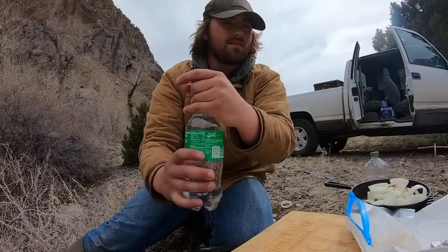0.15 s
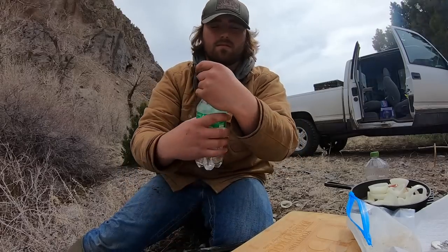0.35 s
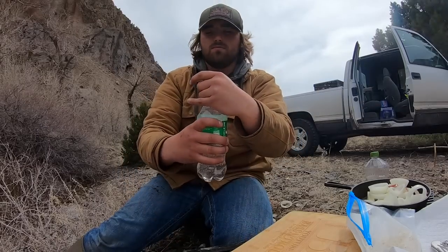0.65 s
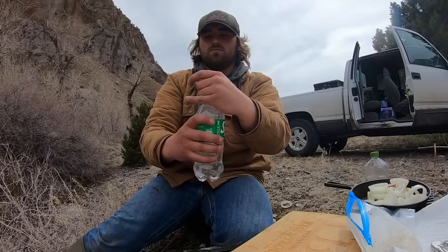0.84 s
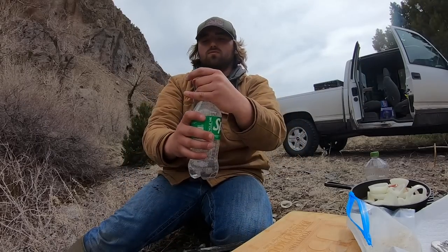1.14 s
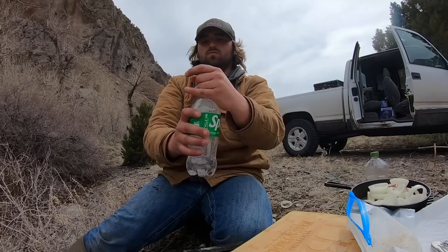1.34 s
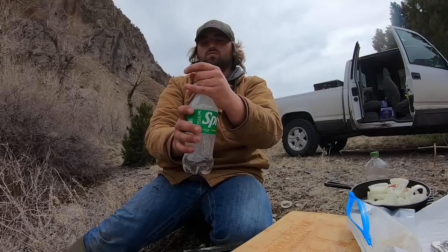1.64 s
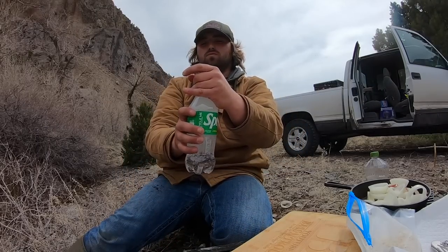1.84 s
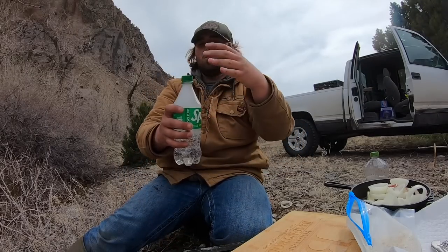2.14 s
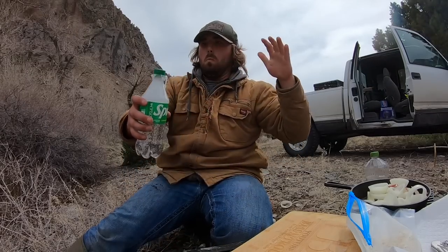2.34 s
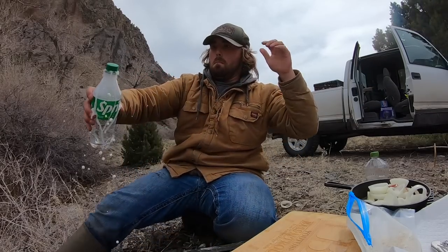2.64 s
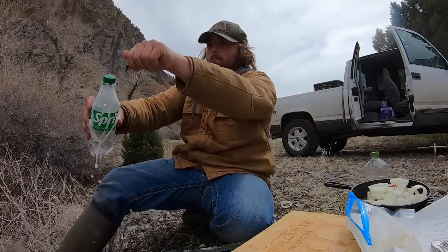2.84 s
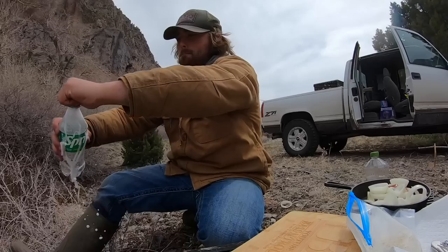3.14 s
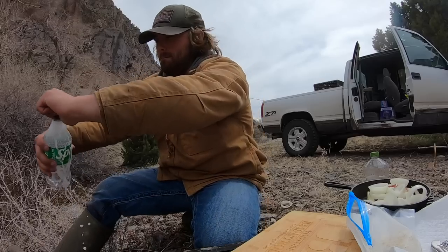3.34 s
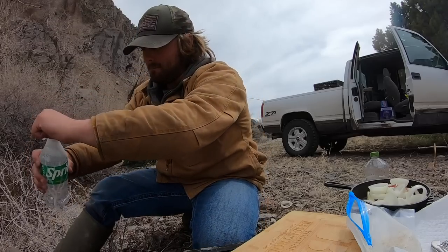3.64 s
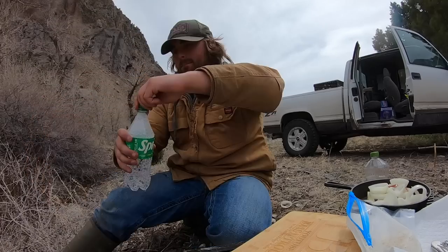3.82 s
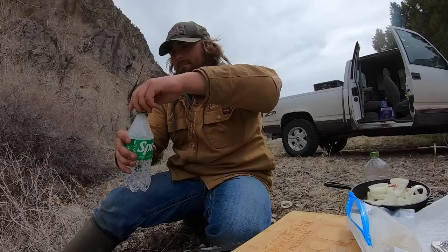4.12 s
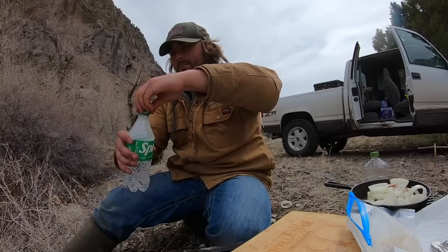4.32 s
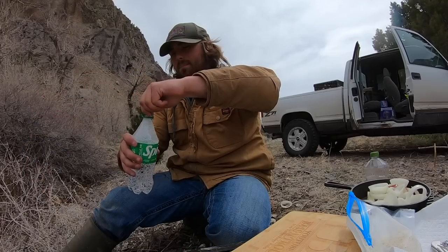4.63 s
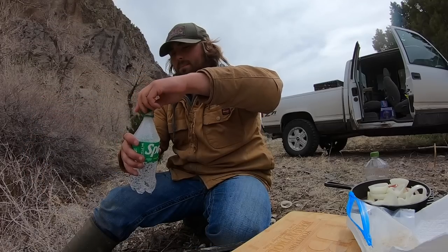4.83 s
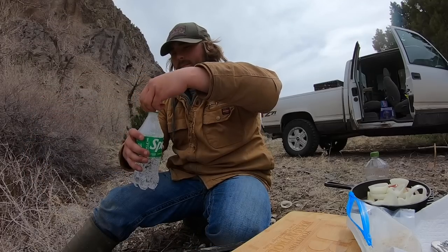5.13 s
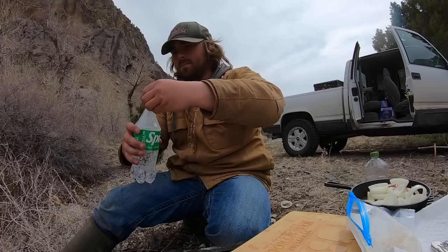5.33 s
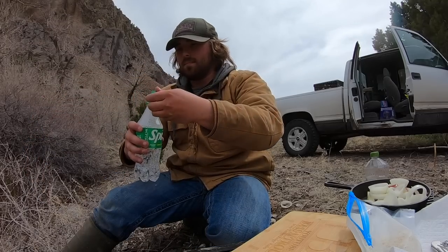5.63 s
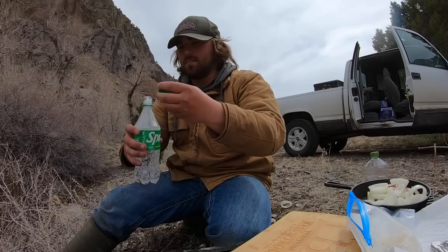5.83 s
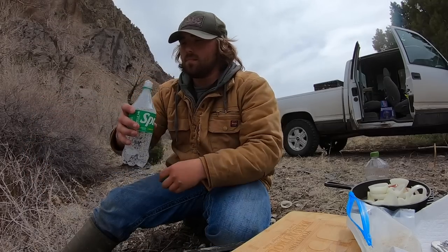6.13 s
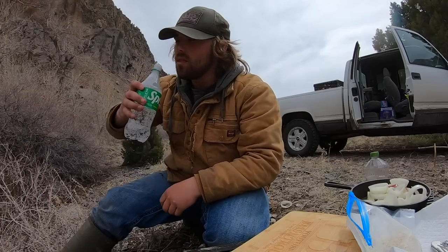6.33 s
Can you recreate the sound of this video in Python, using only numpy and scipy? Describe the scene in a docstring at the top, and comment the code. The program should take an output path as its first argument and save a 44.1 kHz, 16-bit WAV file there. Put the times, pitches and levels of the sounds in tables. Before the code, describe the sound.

Gas hisses from a loosening plastic bottle cap, foam sprays and fizzes, then small clicks and a sharp final snap amid wind and a distant drone.

```python
"""A plastic bottle of fizzy drink is opened outdoors, a metre from the microphone, in wind and a far propeller's drone.
At first gas leaks past the cap as noise through narrow resonances; from 1.4 s cap and fingers click as damped modes.
From 2.07 s foam sprays, noise and random clicks ringing the neck, until the cap is closed again near 3.1 s.
The froth fizzes on as dense tiny clicks until 3.84 s; the cap is unscrewed with rubs and clicks up to 5.6 s.
Wind buffets the microphone as low noise, hardest near 5 s; a faint far bird whistles twice after 6 s."""
import sys
import numpy as np
from scipy import signal
from scipy.fft import rfft, irfft
from scipy.io import wavfile
from scipy.ndimage import uniform_filter1d

SR = 44100
rng = np.random.default_rng(int(sys.argv[2]) if len(sys.argv) > 2 else 0)


def master(y):
    """Save y as 16-bit WAV."""
    cut = np.clip(np.atleast_2d(y).T, -1, 1)
    pcm = np.round(cut * 32767)  # scale
    wavfile.write(sys.argv[1], SR, pcm.astype(np.int16))


N = 285327
T = np.arange(N) / SR  # time [s]
RING_N = 6000  # samples kept of each short response

# damped modes of the plastic cap: (frequency [Hz], level [dB], time to fall 60 dB [s])
CAP_MODES = [(766, -4, 0.0063), (1160, 3, 0.0043), (1710, -1, 0.0049), (2085, -4.5, 0.0083),
             (2910, -4.5, 0.0055), (3530, -2, 0.0042), (4070, 1, 0.0052), (4615, -3.5, 0.0081),
             (5420, -0.5, 0.0036), (6340, -4, 0.0037), (7420, -4.5, 0.0031), (9190, -5.5, 0.0055),
             (10540, -2.5, 0.0046), (12770, -7.5, 0.0037), (14060, -6.5, 0.0042)]


def undb(db):
    """Gain of a level in dB."""
    return 10 ** (np.asarray(db) / 20)


def unit(x):
    """Scaled to rms 1."""
    return x / np.sqrt(np.mean(x ** 2))


def smooth_twice(x, n):
    """Two running means of n samples in a row."""
    return uniform_filter1d(uniform_filter1d(x, n), n)


def played(table):
    """Columns of a table whose first column is time, interpolated on every sample."""
    s, *columns = np.transpose(table)
    return [np.interp(T, s, column) for column in columns]


def walk(rate):
    """Random levels held for 1 / rate seconds and smoothed twice, rms 1."""
    k = int(SR / rate)
    steps = np.repeat(rng.standard_normal(N // k + 1), k)
    return unit(smooth_twice(steps, k)[:N])


def steady(x, span_s):
    """Noise with its own slow swells evened out, rms close to 1."""
    return x / np.sqrt(smooth_twice(x ** 2, int(span_s * SR)))


def burst(start, rise, hold, fall_db, db):
    """Gain that rises evenly to a level in dB, holds, then falls by so many dB a second."""
    falling_s = np.maximum(T - start - rise - hold, 0)
    return np.clip((T - start) / rise, 0, 1) * undb(db - fall_db * falling_s)


def coloured(points):
    """Noise whose spectrum joins (Hz, dB) points on a log frequency axis, silent outside them."""
    hz, db = np.transpose(points)
    f = np.maximum(np.arange(N // 2 + 1) * SR / N, 1)
    gain = undb(np.interp(np.log(f), np.log(hz), db, left=-120, right=-120))
    return irfft(rfft(rng.standard_normal(N)) * gain, N)


def crackle(rate, spread_db):
    """Random clicks of either sign, rate per second on average, a few larger than the rest; rms 1."""
    hit, size, sign = rng.random((3, N))
    height = undb(-spread_db * np.log(1 - .98 * size))
    return unit((hit < rate / SR) * height * np.sign(sign - .5))


def resonant(x, peaks, drift_db=0.):
    """Sum of band-pass resonances of alternate sign whose strengths may wander, rms 1."""
    out = 0
    for k, (hz, width, db) in enumerate(peaks):
        band = signal.lfilter(*signal.iirpeak(hz, hz / width, SR), x)
        out = out + (-1) ** k * undb(db + drift_db * walk(6.94)) * band
    return unit(out)


def ring(modes, weight_db):
    """Response of damped modes of alternate sign to a blow, peak 1."""
    t = T[:RING_N]
    y = 0
    for k, (hz, db, t60) in enumerate(modes):
        decay = 1000. ** (-t / t60)  # 60 dB down after t60
        y = y + (-1) ** k * undb(db + weight_db[k]) * np.sin(2 * np.pi * hz * t) * decay
    return y / np.abs(y).max()


def nearness(hz, octaves):
    """How strongly a contact brightest at hz drives each cap mode, in dB; it falls faster above."""
    away = np.log2(np.array(CAP_MODES)[:, 0] / hz) / max(octaves, .1)
    return -4.0 * np.log2(1 + away ** 2) * np.where(away > 0, 1.3, 1)


def air():
    """Almost steady hiss of open air and microphone: coloured noise."""
    # spectrum of the hiss: (frequency [Hz], relative density [dB])
    hiss_spectrum = [(53, -34), (90, -4.5), (109, -15.5), (162, -17), (376, -22.5), (478, -20.5),
                     (556, -23), (769, -24), (4550, -30), (12100, -34), (16000, -39)]
    return unit(coloured(hiss_spectrum)) * undb(-63.5 + 0.14 * walk(2.295))


def drone():
    """Propeller blade tones, four multiples of the blade rate, that waver on their long path through the air."""
    # (time [s], blade rate [Hz], mean rms level of multiples 1, 2, 3 and 4 [dB each])
    blade_tones = [(0, 81.7, -56.5, -73.5, -77.5, -91), (1.5, 81.5, -61.5, -70, -78.5, -78),
                   (1.8, 81.4, -61, -61.5, -76.5, -79), (1.86, 81.3, -83, -63.5, -77, -82),
                   (2.03, 81.28, -76, -62, -73, -83), (2.12, 82.5, -60.5, -67, -78.5, -83),
                   (3.1, 82.3, -66.5, -66, -70, -79), (3.7, 82.05, -61, -72.5, -75.5, -88),
                   (4.0, 81.8, -63, -96, -88, -97), (5.8, 79.13, -65, -83.5, -90.5, -94),
                   (6.47, 78.5, -55.5, -81, -78, -92)]
    hz, *levels = played(blade_tones)
    phase = 2 * np.pi * np.cumsum(hz) / SR
    out = 0
    for k, db in enumerate(levels, 1):
        wavering = undb(db + 2.0 * walk(5.05))
        out = out + np.sqrt(2) * wavering * np.sin(k * phase + k)
    return out


def bird():
    """Short falling whistles of a faint far bird: gliding sines that swell and fade."""
    # (start [s], length [s], first frequency [Hz], last frequency [Hz], peak level [dB])
    whistles = [(6.058, .055, 3450, 3200, -68), (6.235, .03, 3150, 3100, -68)]
    out = 0
    for s, length, hz0, hz1, db in whistles:
        part = np.clip((T - s) / length, 0, 1)
        phase = 2 * np.pi * np.cumsum(hz0 + (hz1 - hz0) * part) / SR
        out = out + undb(db) * np.sin(np.pi * part) * np.sin(phase)
    return out


def wind():
    """Slow pressure swings at the microphone, buffeting in small gusts, and a flutter that grows faster than it."""
    # strength of the wind: (time [s], pressure swings [dB], buffeting before small gusts [dB])
    gusts = [(0.0, -29.5, -42), (.13, -35, -36), (.35, -37.5, -48), (.95, -37.5, -47), (1.2, -41.5, -66),
             (1.75, -26, -51), (1.9, -37, -48), (2.2, -39, -64), (2.36, -29.5, -51), (2.5, -40.5, -62),
             (2.7, -31, -50.5), (3.03, -45.5, -62.5), (3.25, -28, -55), (3.55, -37.5, -65.5),
             (3.85, -32.5, -44.5), (4.15, -33.5, -48.5), (4.35, -22, -41), (4.6, -39.5, -52.5),
             (4.74, -30.5, -51.5), (4.8, -38, -33), (4.93, -20.5, -19.5), (5.05, -16.5, -28),
             (5.13, -32.5, -46.5), (5.45, -33.5, -50.5), (5.82, -29, -43.5), (6.03, -36.5, -58),
             (6.3, -28, -42), (6.47, -39, -48.5)]
    # spectra of the three motions: (frequency [Hz], relative density [dB])
    swing_spectrum = [(2, -6.5), (6, 1.5), (14, -4), (26, -24)]
    buffet_spectrum = [(20, 2), (32, 7), (55, -11), (100, -26), (180, -41.5), (400, -77)]
    flutter_spectrum = [(35, -4), (60, 2), (110, -9.5), (200, -25.5), (400, -42.5), (900, -45)]
    gusty_db = 1.7  # rms of the small gusts
    strong_db, strong_flutter_db = -17.5, -32  # flutter level at this strong buffeting
    growth = 1.4  # dB of flutter per dB of buffeting

    swing_db, buffet_db = played(gusts)
    buffet_db = buffet_db + gusty_db * walk(9.8)
    swings = steady(coloured(swing_spectrum), 0.18) * undb(swing_db)
    buffeting = steady(coloured(buffet_spectrum), 0.066) * undb(buffet_db)
    flutter_db = strong_flutter_db + growth * (buffet_db - strong_db)
    flutter = unit(coloured(flutter_spectrum)) * undb(flutter_db)
    return swings + buffeting + flutter


def bumps():
    """Dull bumps, perhaps the bottle wall flexing: low sines that swell quickly and die away."""
    # (start [s], level before swell and decay [dB], frequency [Hz], time to fall 60 dB [s])
    pushes = [(2.75, -46.5, 146, 0.19), (2.821, -44, 152, 0.22), (3.15, -46, 152, 0.21),
              (3.275, -41, 150, 0.18)]
    out = 0
    for s, db, hz, t60 in pushes:
        age = np.maximum(T - s, 0)
        swell = 1 - np.exp(-age / 0.0089)
        out = out + undb(db) * np.sin(2 * np.pi * hz * age) * 1000. ** (-age / t60) * swell
    return out


def clicks():
    """Cap and fingers: each click rings the cap modes near its own brightness and thuds the bottle."""
    # (time [s], peak of the cap part [dB], brightest [Hz], breadth [octaves], bottle thud relative to it [dB])
    contacts = [(1.410, -34, 6000, 0.66, -40), (1.588, -30.5, 9500, 0.39, -45),
                (1.5933, -29.5, 4650, 0.16, -42), (1.98, -48, 3500, 0.65, -35),
                (2.138, -37, 1540, 0.4, -29), (2.17, -24.5, 8600, 0.17, -40), (2.309, -35, 9000, 0.53, -40),
                (2.994, -28.5, 10970, .5, -32), (3.051, -36, 9070, 0.64, -27),
                (3.116, -39.5, 9870, .8, -14), (3.144, -31, 11000, 0.32, -38),
                (3.2576, -26.5, 9200, 0.82, -3), (3.281, -38.5, 8040, 0.72, -14),
                (3.347, -50, 1300, .8, -18), (3.368, -46, 3000, 1.07, -5), (3.377, -55, 1500, 0.97, 3),
                (3.687, -44, 2980, 0.35, -38), (3.758, -45, 3477, .8, -30), (3.811, -51, 4900, .4, -30),
                (3.8687, -38.5, 7000, 0.46, -33), (3.920, -41.5, 2070, 0.36, -32),
                (4.078, -45.5, 2300, .7, -21), (4.323, -50, 2190, .4, -25), (4.434, -45.5, 3020, 0.87, -25),
                (4.509, -36.5, 4060, 0.78, -30), (4.5151, -34, 2480, 0.58, -15),
                (4.5252, -31, 2400, 0.58, -35), (4.534, -44, 2900, .8, -10), (4.716, -46, 2500, 0.79, -27),
                (4.816, -47.5, 3530, 0.68, -25), (4.860, -46, 4000, 0.53, -22),
                (5.1204, -20.5, 2400, 0.57, -27.5), (5.163, -50, 5090, .6, -41),
                (5.5995, -8, 4300, 0.58, -35)]
    # damped modes of the bottle: (frequency [Hz], level [dB], time to fall 60 dB [s])
    bottle_modes = [(258, -0.5, 0.018), (380, -1, 0.013), (576, 0, 0.016), (894, -0.5, 0.0083)]
    thud = ring(bottle_modes, np.zeros(len(bottle_modes)))
    chances = rng.standard_normal((len(contacts), len(CAP_MODES)))  # each click strikes the modes unevenly
    out = np.zeros(N + RING_N)
    for (s, db, hz, octaves, thud_db), chance in zip(contacts, chances):
        snap = ring(CAP_MODES, nearness(hz, octaves) + 0.92 * chance)
        at = int(s * SR)
        out[at:at + RING_N] += undb(db) * (snap + undb(thud_db) * thud)
    return out[:N]


def rubs():
    """Cap thread rubbing on the neck: stick-slip clicks in uneven bunches excite the cap modes."""
    # (start [s], hold [s], level [dB], brightest [Hz])
    strokes = [(3.135, .03, -60, 3000), (3.36, 0.01, -56, 2800), (3.435, .03, -71, 2900),
               (3.879, 0.016, -61, 2130), (3.909, 0.019, -55, 2480), (3.948, 0.032, -62.5, 2200),
               (4.105, 0.0096, -65, 2500), (4.315, 0.023, -59, 2300), (4.366, 0.032, -60.5, 2260),
               (4.424, .012, -62.5, 2800), (4.503, .025, -52, 3560)]
    slips = crackle(1800, 2.7) * undb(3.3 * walk(100))
    out = 0
    for s, hold, db, hz in strokes:
        response = ring(CAP_MODES, 0.7 * nearness(hz, 0.4))
        rubbing = unit(signal.fftconvolve(slips, response)[:N])
        out = out + rubbing * burst(s, rise=0.0056, hold=hold, fall_db=600, db=db)
    return out


def fizz():
    """Countless tiny bubbles bursting in the froth: dense clicks through resonances that fade, then are cut off."""
    # resonances of the froth: (frequency [Hz], width [Hz], level [dB])
    froth = [(2920, 1300, -3.5), (4740, 890, -1), (9600, 3000, -1), (14000, 3000, -12)]
    ends_s, cut_db_per_s = 3.84, 400
    cut = undb(-cut_db_per_s * np.maximum(T - ends_s, 0))
    fading = burst(start=3, rise=0.1, hold=.15, fall_db=15.5, db=-58)
    return resonant(crackle(4000, 2.9), froth) * fading * cut


def spray():
    """Gas noise and bursting bubbles ring the neck; dry gas spits, wet foam is brighter and gurgles below."""
    # foam forced out of the neck: (time [s], level [dB])
    outflow = [(2.066, -76), (2.076, -51.5), (2.11, -48), (2.35, -47.5), (2.43, -46.5), (2.52, -43.5),
               (2.75, -45), (3.0, -46.5), (3.055, -45), (3.085, -63), (3.14, -57.5), (3.3, -64)]
    # resonances of neck, neck treble, mist and gurgle: (frequency [Hz], width [Hz], level [dB])
    neck_peaks = [(954, 140, -3), (1510, 265, -1), (2570, 750, -2.5), (3900, 680, -1), (5150, 500, -2)]
    treble_peaks = [(6220, 1200, 0.5), (7900, 1700, 2), (10460, 2400, -3)]
    mist_peaks = [(13800, 5600, 0)]
    gurgle_peaks = [(136, 120, -3), (260, 167, -1.5), (420, 215, 1), (600, 410, -4)]
    wetting_s = 2.03, 2.53  # the jet turns from dry gas to foam between these times

    def wetted(dry_db, wet_db):
        return np.interp(T, wetting_s, (dry_db, wet_db))

    spitting = undb(wetted(4.5, 1.5) * walk(120))
    sputter = rng.standard_normal(N) * spitting + 1.06 * crackle(2000, 3.2)
    slugs = rng.standard_normal(N) * undb(1.8 * walk(24.9))
    neck = resonant(sputter, neck_peaks, drift_db=1.37)
    treble = undb(wetted(-8.5, -4.5)) * resonant(sputter, treble_peaks, drift_db=0.3)
    mist = undb(wetted(-17, -18)) * resonant(sputter, mist_peaks)
    gurgle = undb(wetted(-23.5, -14)) * resonant(slugs, gurgle_peaks)
    flowing = (T > outflow[0][0]) * (T < outflow[-1][0])
    return undb(played(outflow)[0]) * flowing * (neck + treble + mist + gurgle)


def leak():
    """Turbulent jet whistling loosely in the gap, whose shape changes as the cap turns; it flutters a little."""
    # gas through the gap under the cap, one list for each shape of the gap:
    # (start [s], rise [s], hold [s], fall [dB/s], level [dB], treble relative to it [dB])
    gas_flows = [
        [(0.0, 0.00092, 0.005, 89, -45.5, -7), (.17, 0.023, 0.0089, 100, -61.5, 0.5),
         (.49, 0.036, 0.018, 63, -70.5, 1.5), (.9, 0.032, .11, 150, -72.5, -4)],
        [(1.241, .17, 0.038, 370, -44, -12.5)],
        [(2.07, 0.017, .09, 120, -53.5, 0.5)],
    ]
    # resonances of each gap shape, low and treble: (frequency [Hz], width [Hz], level [dB])
    gap_peaks = [
        [(1740, 750, -10), (2720, 500, -7), (3830, 670, -0.5), (4800, 770, 1.5), (6260, 2200, -7.5)],
        [(1650, 460, -22), (2680, 150, -3), (3700, 730, -8.5), (4580, 360, 2), (5620, 400, -10),
         (6220, 500, -12)],
        [(1670, 64, -2), (3010, 74, -2), (4430, 85, 2), (5170, 250, -1)],
    ]
    gap_treble_peaks = [
        [(7950, 1900, -2), (10100, 1100, 3), (13600, 3000, -4.5)],
        [(8950, 960, 0), (10500, 1200, -7), (13500, 2400, -9)],
        [(7050, 60, -4), (8100, 52, 1), (9800, 280, -4.5), (10440, 40, -5)],
    ]
    out = 0
    for flows, low_peaks, high_peaks in zip(gas_flows, gap_peaks, gap_treble_peaks):
        low = resonant(rng.standard_normal(N), low_peaks)
        high = resonant(rng.standard_normal(N), high_peaks)
        jet = sum(burst(*flow) * (low + undb(treble_db) * high) for *flow, treble_db in flows)
        out = out + undb(0.82 * walk(61.2)) * jet
    return out


def surroundings(x):
    """Direct sound, one bounce off the ground and a short diffuse scatter from rocks and brush."""
    ground_s, ground_db = .0017, -12
    scatter_t60_s, scatter_db = .07, -19  # level of the whole scatter's energy
    t = T[:RING_N]
    reply = rng.standard_normal(len(t)) * 1000. ** (-t / scatter_t60_s) * (t > ground_s)
    reply *= undb(scatter_db) / np.linalg.norm(reply)
    reply[0] = 1  # direct sound
    reply[int(ground_s * SR)] += undb(ground_db)
    return signal.fftconvolve(x, reply)[:N]


def scene():
    """The bottle in its surroundings over wind, drone, bird and air."""
    bottle = surroundings(bumps() + clicks() + rubs() + fizz() + spray() + leak())
    return (air() + drone() + bird() + wind() + bottle)[None]


def record(dry):
    """A small camera's sound channel: a steep low-pass removes the top of the treble."""
    top_hz = 15850
    low_pass = signal.ellip(10, .2, 60, top_hz, fs=SR, output="sos")
    return signal.sosfilt(low_pass, dry)


dry = scene()
out = record(dry)
master(out)
```